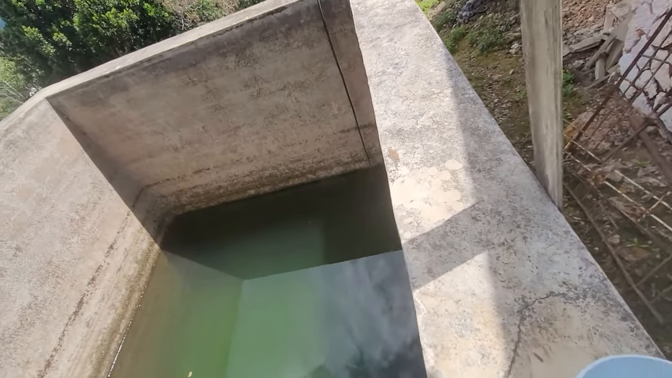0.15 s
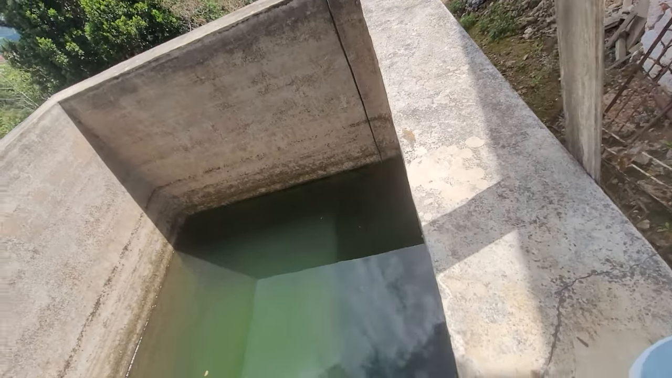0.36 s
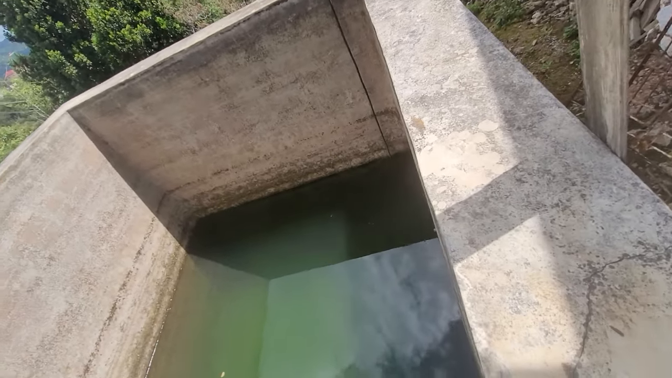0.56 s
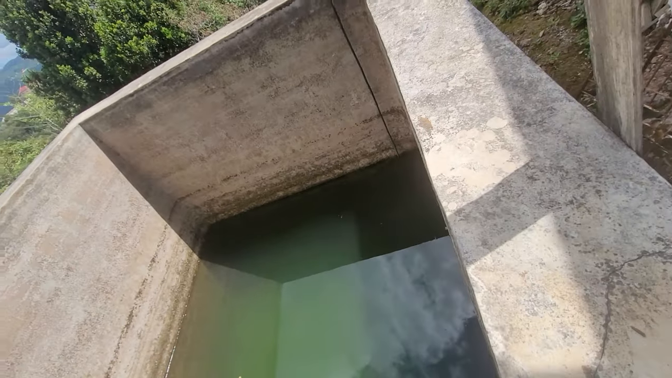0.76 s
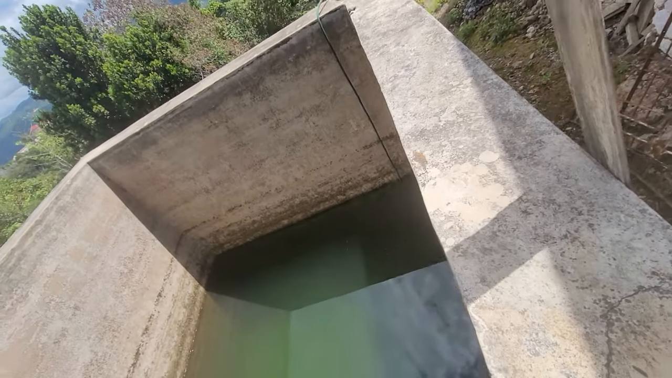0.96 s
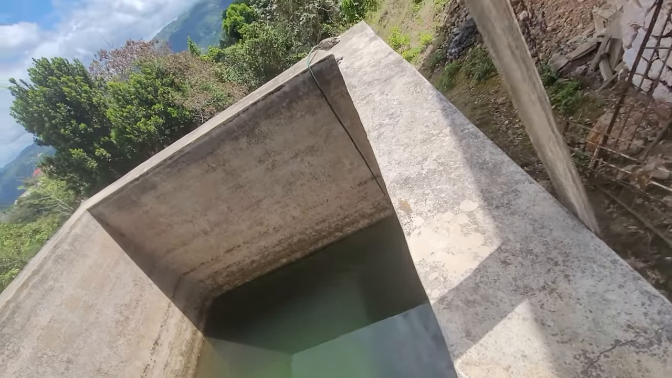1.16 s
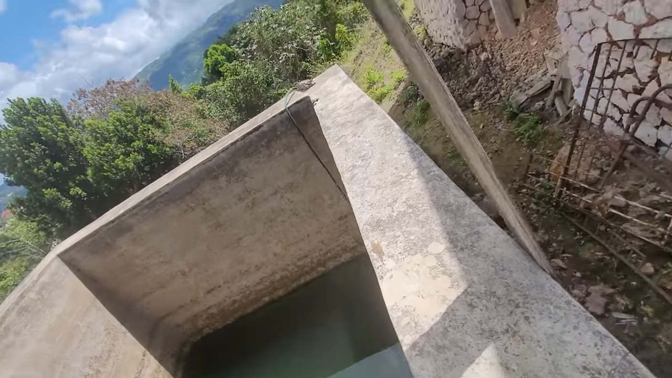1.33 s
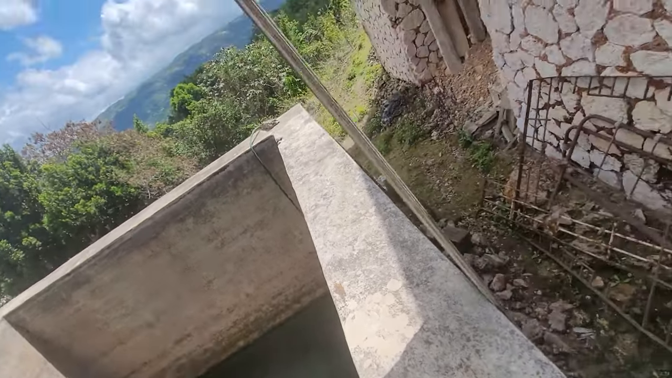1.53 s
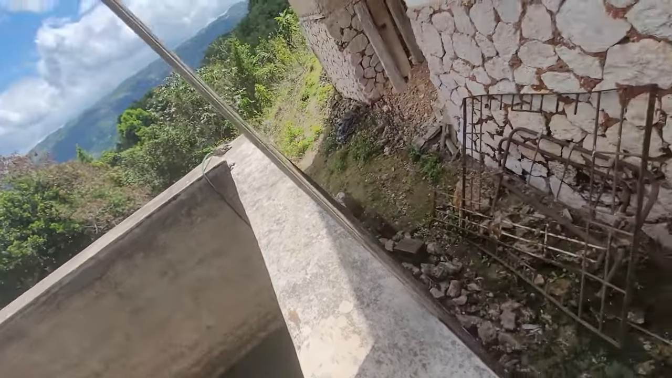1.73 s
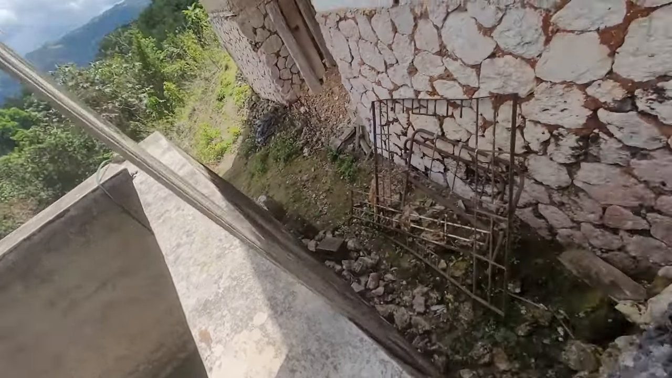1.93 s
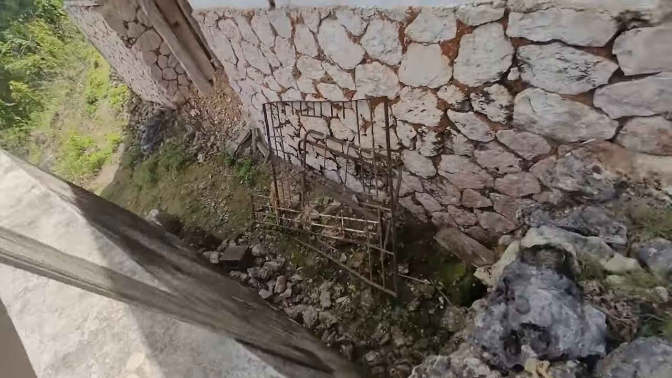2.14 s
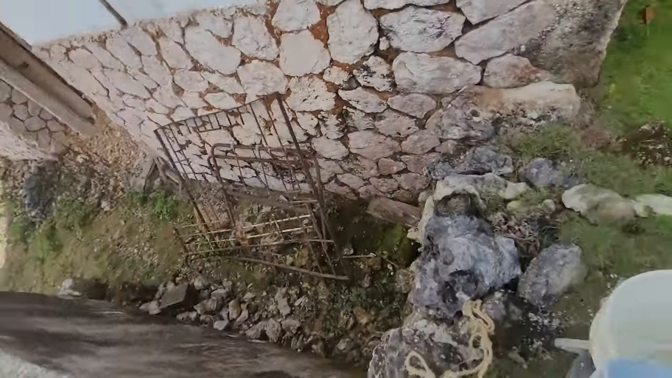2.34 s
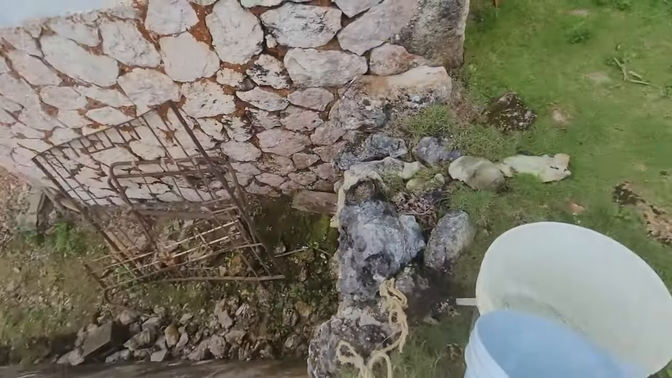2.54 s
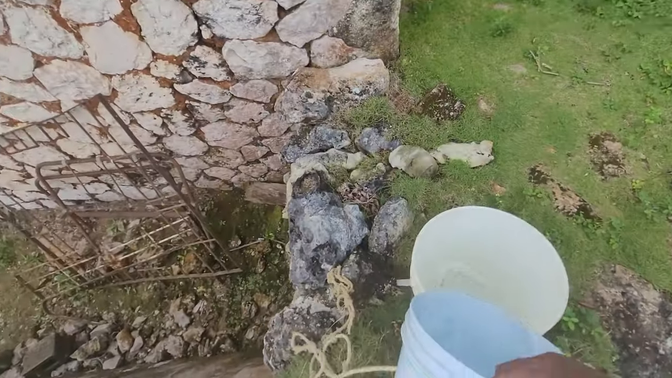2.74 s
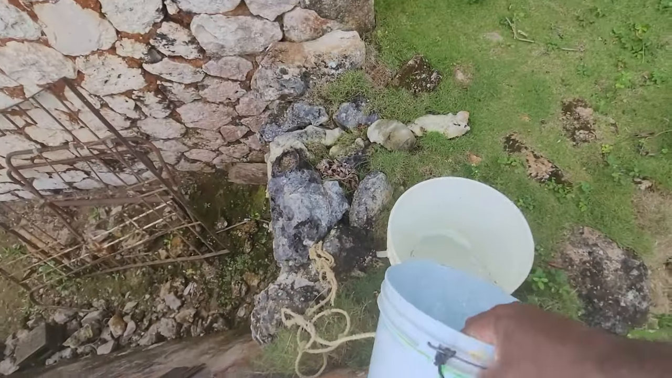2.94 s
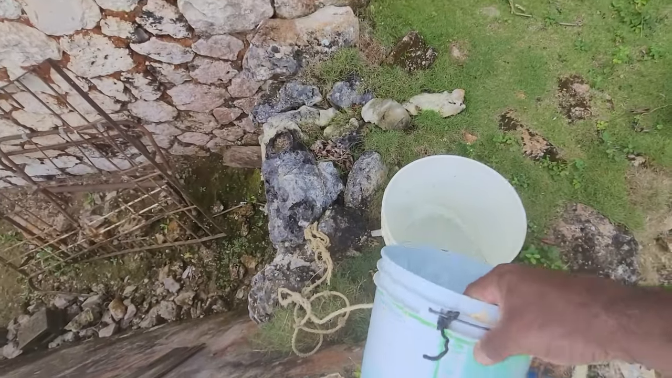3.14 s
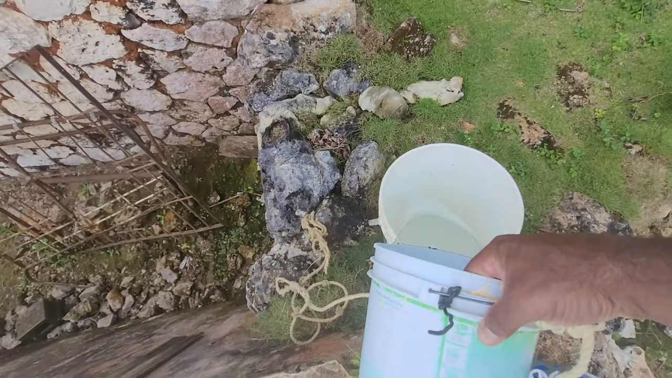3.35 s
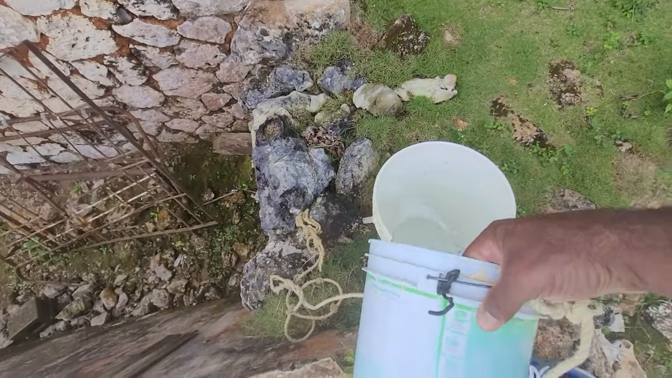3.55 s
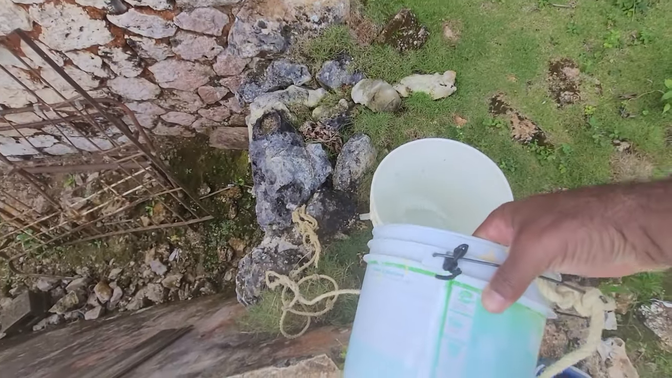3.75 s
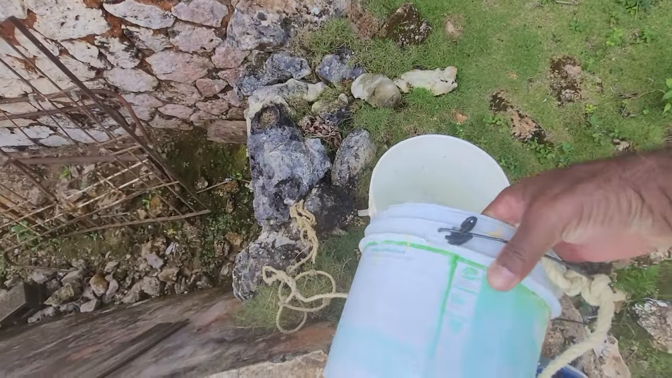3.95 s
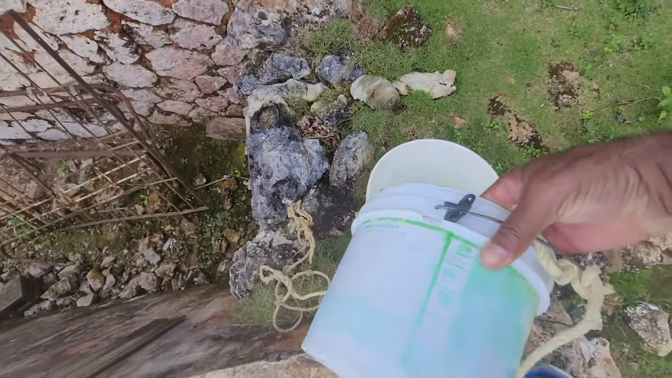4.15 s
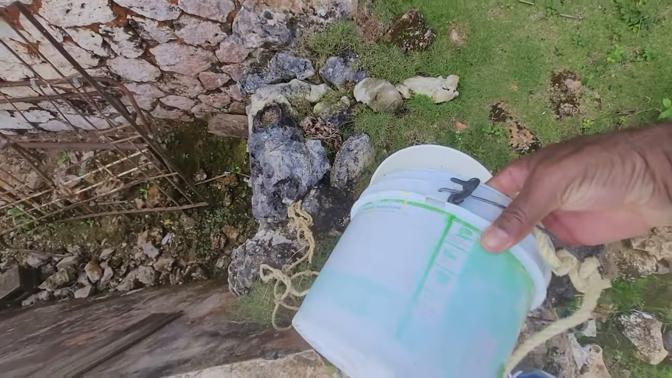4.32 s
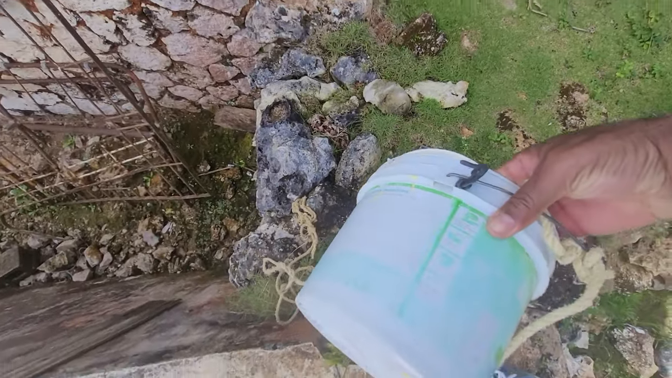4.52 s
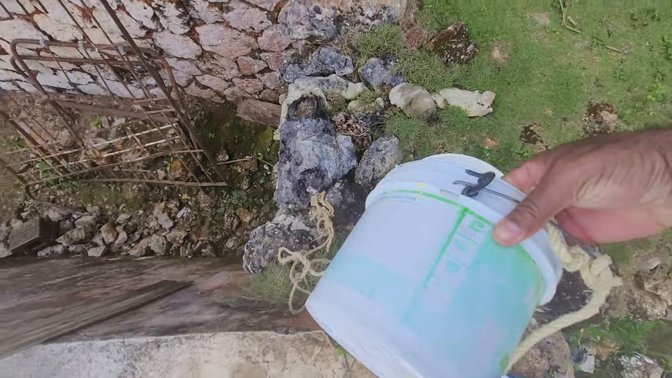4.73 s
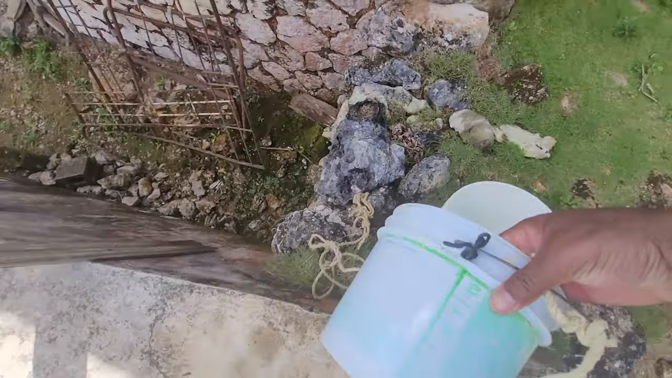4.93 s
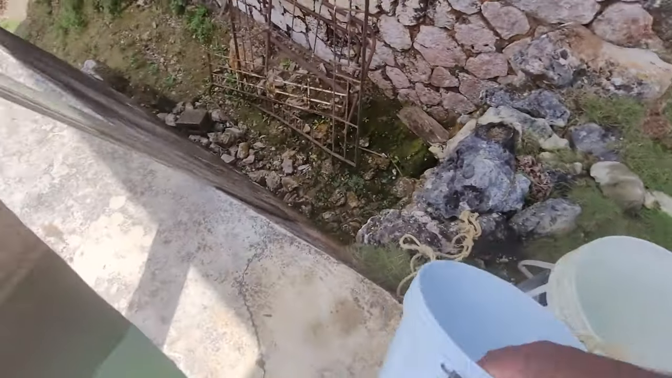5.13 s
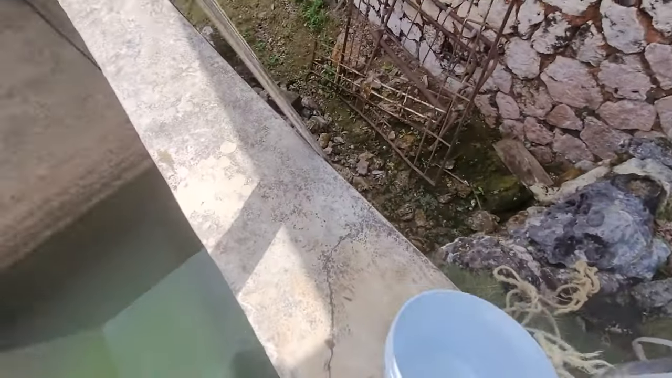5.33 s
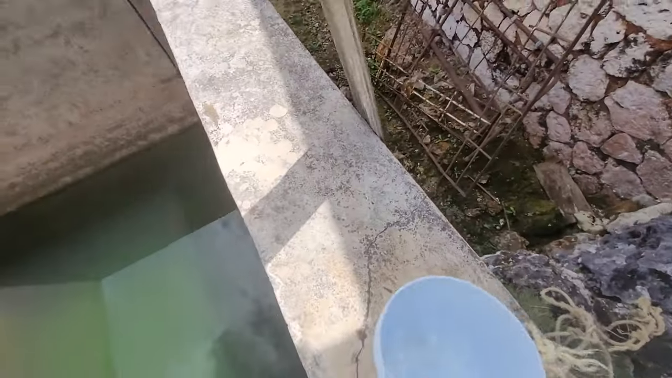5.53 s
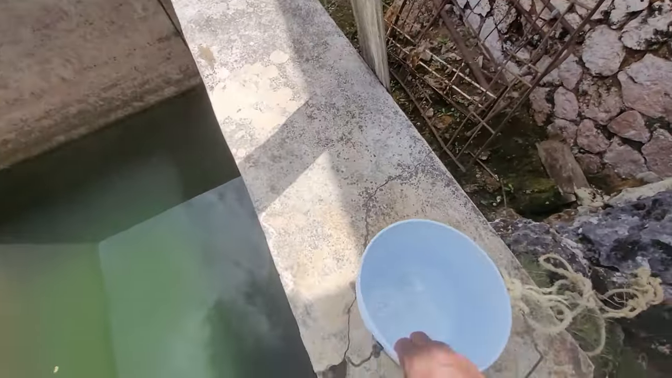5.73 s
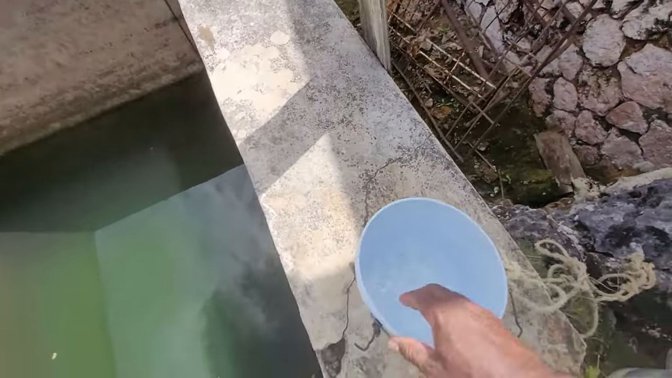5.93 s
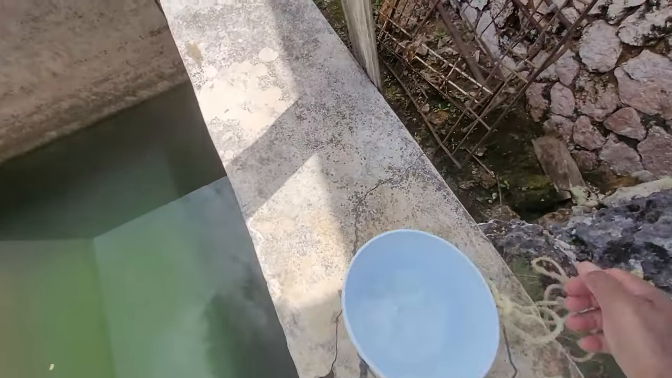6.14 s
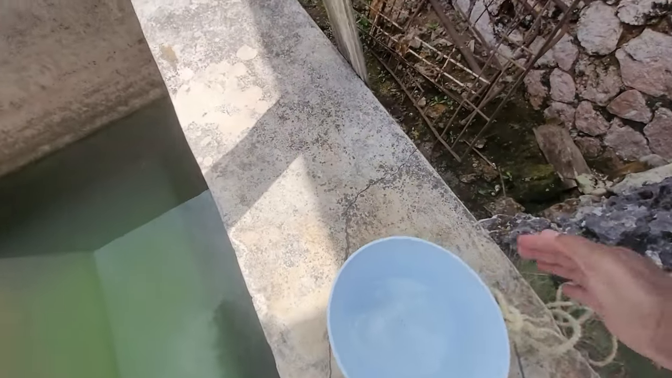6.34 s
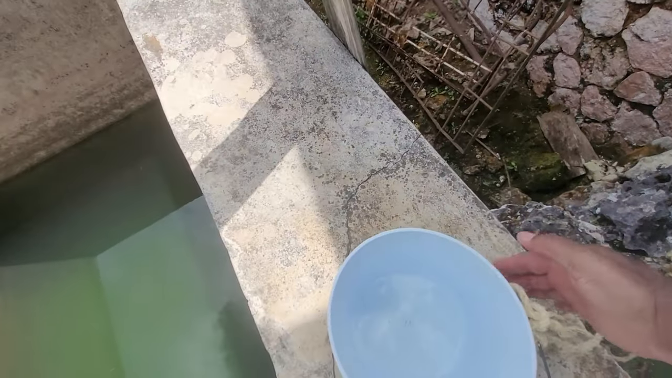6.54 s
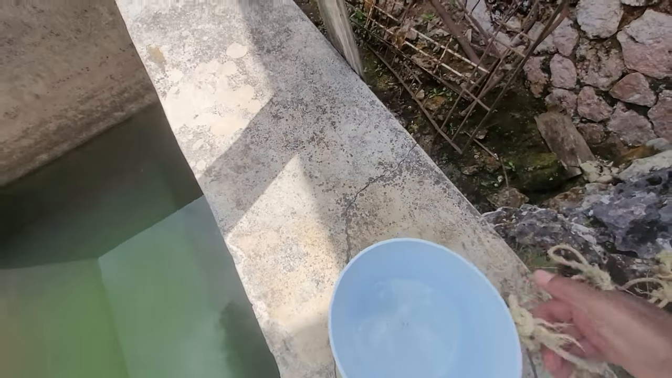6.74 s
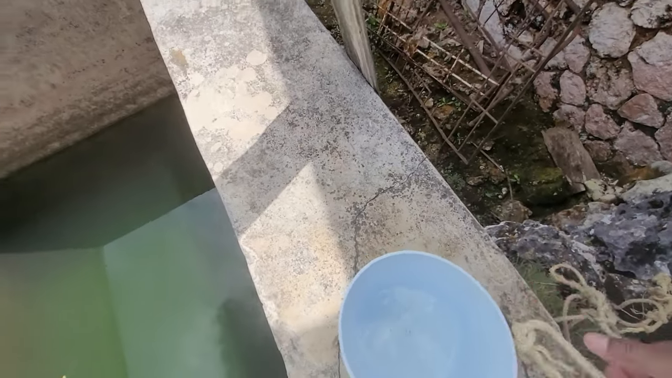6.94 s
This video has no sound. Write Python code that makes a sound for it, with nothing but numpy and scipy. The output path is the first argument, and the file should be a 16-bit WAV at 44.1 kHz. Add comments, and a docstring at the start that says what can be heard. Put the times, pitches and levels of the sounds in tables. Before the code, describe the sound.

Outdoors, light wind nudges the microphone over a faint hush of leaves and a distant bird and insect. Close by, a plastic bucket drags shortly over concrete, then empties into another bucket for about three seconds, spattering, bubbling and glugging. Its handle clicks and the stream thins to a dribble. The empty bucket lands on the concrete with a loud hollow knock, followed by small scrapes and soft bumps.

```python
"""Water pours from one plastic bucket into another, outdoors: drops spatter, bubbles ring and the air
in the lower bucket booms. First the full bucket is dragged off the gritty rim of a concrete tank;
afterwards the empty one is set down hard, rings briefly and is shuffled into place.
Light wind nudges the microphone, leaves hush, and a bird and an insect call far off."""
import sys
import numpy as np
from scipy import signal
from scipy.fft import rfft, irfft
from scipy.io import wavfile
from scipy.ndimage import uniform_filter1d, map_coordinates

SR = 44100
rng = np.random.default_rng(int(sys.argv[2]) if len(sys.argv) > 2 else 0)


def to_wav(s):
    """Save 16-bit WAV."""
    ch = np.atleast_2d(s).T  # columns
    pcm = np.round(np.clip(ch, -1, 1) * 32767)  # PCM
    wavfile.write(sys.argv[1], SR, pcm.astype(np.int16))


N = 312228
TIME = np.arange(N) / SR

# Levels in the tables are relative. A fade_s is the time a sound takes to fall by 60 dB.
# Tone of grit scraping on concrete: pitch_hz, level_db
GRIT_TONE = [(59, -54), (100, -17.5), (477, -7), (576, -15.5), (697, -6), (1040, -17.5), (1260, -8.5),
             (1430, -18.5), (2370, -18), (2990, -25.5), (15500, -32.5)]
# How much louder the left side is than the right: pitch_hz, left_minus_right_db
BALANCE = [(200, 0), (700, -2), (1290, -1.5), (2380, -4), (4400, -1), (9000, -1)]


def amp(db):
    """Turns decibels into a gain."""
    return 10 ** (np.asarray(db) / 20)


def evened(x):
    """Scales a signal to an average (rms) level of 1."""
    return x / np.sqrt(np.mean(x ** 2) + 1e-20)


def steadied(x, samples):
    """Takes out slow drifts of level and keeps the quick ones."""
    return x / np.sqrt(abs(uniform_filter1d(x ** 2, samples)) + 1e-9)


def read(points, hz):
    """Looks up a table's value at any pitch, on a log scale of pitch."""
    pitches, values = np.transpose(points)
    return np.interp(np.log(hz + 1), np.log(pitches + 1), values)


def curve(points, **ends):
    """Joins (time, value) points with straight lines."""
    return np.interp(TIME, *np.transpose(points), **ends)


def swell(start_s, length_s, rise_s, fade_s):
    """A level that rises, holds for the rest of its length and dies away."""
    t = TIME - start_s
    return np.clip(t / rise_s, 0, 1) ** 2 * amp(-60 * np.maximum(t - length_s, 0) / fade_s)


def add(mix, start_s, sound):
    """Mixes a sound in at the given time."""
    part = mix[..., round(start_s * SR):][..., :sound.shape[-1]]
    part += sound[..., :part.shape[-1]]


def colour(x, tone):
    """Gives a sound the tone in a table, with a filter that rings only after each hit."""
    log_gain = np.log(amp(read(tone, abs(np.fft.fftfreq(4096, 1 / SR)))))
    taps = np.fft.ifft(np.exp(np.conj(signal.hilbert(log_gain)))).real
    return signal.oaconvolve(x, taps[None], axes=1)[:, :x.shape[1]]


def band(x, low_hz, high_hz, order=2):
    """Keeps the pitches between two limits."""
    edges_hz = [low_hz, min(high_hz, .49 * SR)]
    return signal.sosfilt(signal.butter(order, edges_hz, "band", fs=SR, output="sos"), x)


def resonate(x, hz, width_hz):
    """Rings at a pitch that may move; a narrower width rings longer."""
    turn = np.exp(2j * np.pi * np.cumsum(hz * np.ones(x.shape[-1])) / SR)
    decay = np.exp(-np.pi * width_hz / SR)
    return 2 * (turn * signal.lfilter([1 - decay], [1, -decay], x / turn + 1e-18)).real


def body(x, notes, direct):
    """Part of the sound comes straight, the rest rings at an object's own notes."""
    return direct * x + sum(amp(db) * resonate(x, hz, width_hz) for hz, width_hz, db in notes)


def flutter(hz):
    """A random wobble of size about 1, with speeds up to about hz."""
    rates = np.fft.rfftfreq(N, 1 / SR)
    spectrum = rfft(rng.standard_normal(N)) * np.exp(-(rates / hz) ** 2) * (rates > hz / 10)
    return np.clip(evened(irfft(spectrum, N)), -2, 2)


def patter(per_s, spread_db):
    """Two trains of random taps; more spread makes a few stand out."""
    size = amp(spread_db * np.minimum(rng.exponential(1, (2, N)), 4))
    return evened(size * rng.choice([-1, 1], (2, N)) * (rng.random((2, N)) < per_s / SR))


def bursts(rows, width, broad_gain):
    """Short cracks, each strongest around its own pitch, with a spike at first contact."""
    out, t = np.zeros((2, N)), TIME[:SR // 5]
    for start_s, db, hz, fade_s in rows:
        noise = rng.standard_normal((2, 2 * len(t)))
        narrow = evened(band(noise, hz / (1 + width), hz * (1 + width)))
        broad = evened(band(noise, hz / 4, hz * 4, order=1))
        crack = 2 * np.tanh((narrow + broad_gain * broad)[:, len(t):] / 2)
        spike = 1 + np.exp(-t / .0006)
        onset = 1 - np.exp(-2 * hz * t)
        add(out, start_s, band(amp(db - 60 * t / fade_s) * spike * onset * crack, hz / 8, hz * 5))
    return out


def stereo(pair):
    """Two unrelated signals become one source heard left and right, alike in the bass."""
    # How alike the two sides are: pitch_hz, likeness (0 to 1)
    likeness = [(290, 0.87), (640, 0.71), (1400, 0.34), (3100, 0.17), (9000, 0.15)]
    hz = np.fft.rfftfreq(N, 1 / SR)
    common, separate = rfft(pair)
    same = np.clip(read(likeness, hz), 0, 1)
    lean = amp(read(BALANCE, hz) / 2)
    left = same * common + np.sqrt(1 - same ** 2) * separate
    return irfft(np.array([left * lean, common / lean]), N)


def leaves():
    """A soft hush of leaves that wavers a little."""
    # Tone of the hush: pitch_hz, level_db
    tone = [(88, -37), (150, -10), (179, -13.5), (253, -1), (1290, -22.5), (4840, -21.5), (5870, -27),
            (7710, -21.5), (10500, -29.5), (15500, -23.5)]
    # Its slow rise and fall: time_s, level_db
    loudness = [(.3, -68), (1.3, -70), (2.2, -64.5), (5.7, -63.5), (6.4, -69)]
    hush = stereo(evened(colour(rng.standard_normal((2, N)), tone)))
    return hush * amp(curve(loudness) + .7 * flutter(hz=5.5))


def far_calls():
    """A bird's chips and an insect's buzz, smeared by distance into thin bands of noise."""
    # The calls: start_s, level_db, pitch_hz, width_hz, rise_s, fade_s
    calls = [(0, -66, 4390, 1100, 0.02, 1.1), (1.54, -76, 5450, 600, 0.044, 0.56),
             (1.781, -64.5, 8330, 2600, 0.2, 4.2), (5.32, -53.5, 7240, 1355, 0.011, 0.43),
             (5.786, -57, 8070, 913, 0.014, .4), (6.344, -53.5, 7420, 1400, 0.018, 0.47)]
    out, t = np.zeros((2, N)), TIME[:SR]
    for start_s, db, hz, width_hz, rise_s, fade_s in calls:
        buzz = evened(band(rng.standard_normal((2, SR)), hz - width_hz / 2, hz + width_hz / 2, order=4))
        level = np.minimum(t / rise_s, 1) * amp(db - 60 * np.maximum(t - rise_s, 0) / fade_s)
        add(out, start_s, buzz * level)
    return out


def wind():
    """Wind buffets the microphone in low lumps; each gust hits one side harder."""
    # Tone of the buffeting: pitch_hz, level_db
    tone = [(20, -16), (55, 4), (80, -4.5), (130, -18.5), (200, -29.5), (800, -80.5)]
    # The gusts: start_s, length_s, level_db, left_minus_right_db
    gusts = [(0.024, 0.047, -41.5, 20), (0.735, 0.079, -42, -23), (1.062, 0.3, -48.5, -28),
             (1.352, 0.072, -37.5, -29), (1.506, 0.27, -42, -4), (1.974, 0.066, -38.5, -3.5),
             (2.278, .25, -47.5, -11), (3.4, 1.8, -58.5, 2), (4.604, 0.24, -49, 7), (4.859, 0.51, -39.5, 1),
             (5.638, 0.086, -46.5, -3), (6.13, 0.8, -40, -5.5), (6.411, .1, -28, -8)]
    buffets = steadied(colour(rng.standard_normal((2, N)), tone), samples=2200)
    power = amp(-64) ** 2 / 2  # the calm between gusts
    for start_s, length_s, db, side_db in gusts:
        sides = amp(side_db * np.array([[.5], [-.5]]))
        gust = amp(db) * swell(start_s, length_s, rise_s=.044, fade_s=.25)
        power = power + (gust * sides / np.linalg.norm(sides)) ** 2
    return buffets * np.sqrt(power) * amp(4.3 * flutter(hz=19) - 1.5)


def wall_echoes(x, fade_s):
    """Scattered echoes come back from the stone walls and the tank."""
    t = TIME[:SR // 2]
    echoes = rng.standard_normal((2, len(t))) * (rng.random((2, len(t))) < 3000 / SR)
    tail = echoes * (t > .012) * amp(-60 * t / fade_s)
    return signal.fftconvolve(x, tail / np.linalg.norm(tail[0]), axes=1)[:, :N]


def drag():
    """Grit catches under the full bucket and shakes its walls."""
    # Notes of the full bucket: pitch_hz, width_hz, level_db
    notes = [(467, 30, 1), (689, 15, 4), (830, 40, -7.5), (1214, 54, -8), (2380, 260, -18)]
    # A faint rustle, like a hand gripping the bucket, then pulls over the concrete:
    # start_s, length_s, level_db
    moves = [(0, 0.28, -66.5), (0.451, 0.22, -57), (0.676, 0.033, -39), (0.753, 0.17, -39.5)]
    grit = colour(body(patter(per_s=2200, spread_db=0), notes, direct=.82), GRIT_TONE)
    level = sum(amp(db) * swell(start_s, length_s, rise_s=.035, fade_s=.16)
                for start_s, length_s, db in moves)
    return stereo(steadied(grit, samples=3000) * level)


def knocks():
    """The handle and stray grit click; hand and rope bump softly against the bucket."""
    # Sharp clicks: start_s, level_db, pitch_hz, fade_s
    clicks = [(.433, -53.5, 8750, .018), (.702, -25.5, 2120, .031), (.703, -28, 3892, .023),
              (.706, -28, 620, .07), (.909, -31.5, 3640, .03), (1.864, -46.5, 2200, .034),
              (1.933, -45, 557, .17), (4.5633, -18, 11300, .016), (4.6355, -21.5, 7500, .015),
              (4.6643, -7.5, 4100, .009), (4.674, -17.5, 4230, .018), (6.132, -49, 2880, .008),
              (6.179, -45.5, 3080, .011)]
    # Soft bumps: start_s, level_db
    bumps = [(6.424, -23), (6.552, -23.5), (6.887, -23.5)]
    bump_hz, bump_fade_s = 110, .04
    thuds = [(start_s, db, bump_hz, bump_fade_s) for start_s, db in bumps]
    return stereo(amp(-3) * bursts(clicks + thuds, width=.23, broad_gain=.4))


def shuffle():
    """The empty bucket grinds over the concrete: a hollow rumble with a little grit."""
    # Tone of the rumble: pitch_hz, level_db
    tone = [(70, -12.5), (190, 4), (300, -17), (370, -0.5), (450, -2.5), (500, -14.5), (750, -22.5),
            (825, -12), (900, -30), (1500, -56)]
    # Short slides: start_s, length_s, rumble_db, grit_db, fade_s
    slides = [(5.833, 0.043, -29.5, -43, 0.16), (5.91, .06, -41.5, -61, .3),
              (5.998, 0.073, -44, -58.5, 0.28), (6.135, 0.041, -45.5, -72, 3.1)]
    slips = patter(per_s=520, spread_db=.5) * amp(3.6 * flutter(hz=29.6))
    rumble = steadied(colour(slips, tone), samples=5000)
    grit = evened(band(colour(patter(per_s=670, spread_db=1.5), GRIT_TONE), 970, 14000))
    out = np.zeros((2, N))
    for start_s, length_s, rumble_db, grit_db, fade_s in slides:
        level = swell(start_s, length_s, rise_s=.014, fade_s=fade_s)
        out += (amp(rumble_db) * rumble + amp(grit_db) * grit) * level
    return stereo(out)


def set_down():
    """The empty bucket lands, rocks and is nudged; the hand shortens its ring."""
    # Notes of the empty bucket: pitch_hz, level_db, fade_s
    notes = [(152, -23.5, .2), (234.8, -8, 0.3), (332, -26.5, 0.028), (400.7, -15.5, 0.2), (432, -19, 0.24),
             (530, -27.5, 0.21), (624, -24.5, 0.086), (797, -23, 0.079), (812, -24, 0.18),
             (1054, -33.5, .11), (1231, -34, 0.16), (1561, -25, .06), (1520, -37, 0.14),
             (1650, -33.5, 0.07), (2406, -26, 0.062), (2575, -17.5, 0.024), (3650, -25.5, .025)]
    # Blows on it: start_s, level_db, ring_share (part of the free ringing time)
    blows = [(5.8072, -9.5, 0.081), (5.8101, 4, 0.76), (5.8215, -8, 0.29), (5.935, -29.5, .45),
             (6.02, -25, 0.3), (6.082, -22, 0.17), (6.18, -26.5, 0.27), (6.234, -29, 0.22),
             (6.387, -35, 0.43), (6.545, -29, .19), (6.606, -28.5, 0.12), (6.665, -34, 0.33),
             (6.804, -36, 0.16)]
    # Tone of the crack at each blow: pitch_hz, level_db
    crack_tone = [(180, -10), (300, -2), (701, -12.5), (856, -11), (1150, -34.5), (1560, -16.5),
                  (2570, -24.5), (2980, -32.5), (7200, -33), (16000, -67.5)]
    rings, cracks, t = np.zeros(N), np.zeros((2, N)), TIME[:SR // 2]
    note_hz, note_db, fade_s = np.array(notes).T[:, :, None]
    for start_s, db, ring_share in blows:
        ring = (amp(note_db - 60 * t / (fade_s * ring_share)) * np.sin(2 * np.pi * note_hz * t)).sum(0)
        ring *= amp(-1100 * np.clip(t - .082, 0, None))  # the base settles flat and stops ringing
        crack = evened(colour(rng.standard_normal((2, len(t))), crack_tone))
        crack *= amp(-15 - 60 * t / .032) + amp(-26 - 60 * t / .27)  # quick snap, quieter tail
        bright_hz = 220 + 8460 * amp(db) ** 1.3  # harder blows are brighter
        contact = signal.butter(2, min(bright_hz, SR / 3), fs=SR)
        add(rings, start_s, -amp(db) * signal.lfilter(*contact, ring))
        add(cracks, start_s, amp(db) * signal.lfilter(*contact, crack))
    lean = amp(read(BALANCE, np.fft.rfftfreq(N, 1 / SR)) * np.array([[.5], [-.5]]))
    bucket = irfft(rfft(rings) * lean, N) + stereo(cracks)
    return band(bucket, 160, 19000)  # little bass below 160 Hz


def foam():
    """Tiny bubbles go on bursting in the lower bucket after the pour."""
    fizz = evened(band(patter(per_s=2500, spread_db=4.5), 3800, 19000))
    return fizz * amp(-61.5) * swell(start_s=4.85, length_s=.6, rise_s=.066, fade_s=3.3)


def bubbles(per_s, low_hz, high_hz, cycles, glide, spread_db, sizes=48):
    """Each size of bubble rings for some cycles and rises in pitch as it nears the surface."""
    out = np.zeros((2, N))
    for hz in np.geomspace(low_hz, high_hz, sizes):
        turns = np.arange(0, 5 * cycles, hz / SR)
        ring = np.sin(2 * np.pi * turns * (1 + glide * turns / cycles)) * np.exp(-turns / cycles) * hz
        for side, when, chance in rng.random((round(2 * per_s * N / SR / sizes), 3)):
            strength = amp(spread_db * min(-np.log(chance), np.pi))
            add(out[int(2 * side)], when * N / SR, ring * strength)
    return evened(out)


def follow_pour(base_db, plunge_db, steepness):
    """Gain of one water sound: it grows with the flow and shifts as the stream plunges deeper."""
    # Strength of the stream as the bucket tips: time_s, level_db
    flow_db = [(2.19, -47.5), (2.22, -31.5), (2.36, -31), (2.48, -36), (2.52, -33.5), (2.59, -39.5),
               (2.68, -32.5), (2.77, -39.0), (3.22, -32), (3.26, -28), (3.34, -32.5), (3.75, -26.0),
               (3.77, -30), (4.2, -32.5), (4.26, -28.5), (4.38, -33.5), (4.64, -33), (4.67, -29),
               (4.69, -34.5), (4.92, -43.5), (4.95, -55.5), (4.98, -54)]
    # How it lands: time_s, depth (0 spatters on the surface, 1 plunges deep)
    depth = [(2.2, 0.34), (2.4, 0.59), (2.68, 0.1), (2.85, 0.36), (3.65, 0.68), (4.3, 1), (4.62, 0.7),
             (4.8, 0.63)]
    full_db = -32  # a full flow
    last_dribble = amp(-45) * swell(start_s=5.04, length_s=.16, rise_s=.12, fade_s=.48)
    flow = amp(curve(flow_db, left=-140, right=-140)) + last_dribble
    return (flow / amp(full_db)) ** steepness * amp(full_db + base_db + plunge_db * curve(depth))


def boom():
    """The stream pumps the air in the lower bucket; large bubbles glug and pockets of air gulp."""
    # The air's note, which rises through the pour and sinks a little at the end: time_s, pitch_hz
    air_note = [(2.2, 203), (3.1, 216), (3.7, 237), (4.2, 270.5), (4.55, 259), (4.9, 245)]
    # Big gulps of trapped air: start_s, level_db
    gulps = [(2.228, -30), (2.917, -28), (3.107, -22), (3.399, -23.5), (3.66, -29), (3.851, -23),
             (4.082, -18), (4.165, -24), (4.247, -18.5), (4.289, -21.5), (4.353, -15), (4.553, -18),
             (4.675, -23), (4.77, -24), (4.869, -26.5), (5.241, -39)]
    hz, t = curve(air_note), TIME[:SR // 5]
    pushes = patter(per_s=540, spread_db=1.5)[0]
    air = band(resonate(resonate(pushes, hz, width_hz=48), hz, width_hz=190), 150, 1200)
    glugs = bubbles(per_s=110, low_hz=270, high_hz=440, cycles=3.5, glide=.005, spread_db=2.5, sizes=12)
    air = steadied(air * amp(1.7 * flutter(hz=21)), samples=5000)
    out = air * follow_pour(base_db=-19.5, plunge_db=14.1, steepness=.72)
    out += steadied(glugs[0], samples=8000) * follow_pour(base_db=-10.5, plunge_db=-8.5, steepness=1)
    for start_s, db in gulps:
        gulp_hz = .99 * np.interp(start_s, TIME, hz)  # just under the air's note
        level = amp(db - 60 * t / .094) * (1 - np.exp(-t / .004))
        add(out, start_s, level * np.sin(2 * np.pi * gulp_hz * t))
    return out


def slaps():
    """The loudest slaps of water; higher ones die sooner."""
    # The slaps: start_s, level_db, pitch_hz
    hits = [(2.182, -33.5, 11200), (2.354, -27, 1330), (2.655, -32, 5560), (2.894, -30, 7200),
            (3.228, -26.5, 3170), (3.45, -22.5, 2460), (3.515, -21, 2200), (3.640, -23.5, 6140),
            (3.856, -22.5, 1760), (3.974, -24.5, 2600), (4.725, -36, 2770), (4.75, -33.5, 3950),
            (4.776, -28, 2800), (4.909, -50, 2020), (5.009, -41.5, 1450), (5.094, -47, 1550),
            (5.295, -41.5, 1070)]
    rows = [(start_s, db, hz, .056 * (1000 / hz) ** .31) for start_s, db, hz in hits]
    return bursts(rows, width=.47, broad_gain=.5)


def stream():
    """Lumps of water land as drops and bubbles: low gurgle, splash, fine spray and coarse spatter."""
    # Tone of the landing water: pitch_hz, level_db
    tone = [(210, -25), (350, 1), (512, -1), (671, -2.5), (892, -3.5), (1060, -2.5), (1680, 0), (2310, 4),
            (3780, 5), (7710, -11), (8760, -20.5), (11500, -16), (15500, -20.5)]
    # Higher notes of the air in the lower bucket: pitch_hz, width_hz, level_db
    hollow_notes = [(388, 7.3, -5), (702, 97, 1), (797, 59, -0.5), (1044, 120, 5), (1247, 77, -0.5),
                    (1477, 38, -0.5), (1790, 55, -10.5), (2330, 120, -6)]
    lumps = flutter(hz=45)
    drops = patter(per_s=7000, spread_db=4.5)
    froth = bubbles(per_s=1300, low_hz=600, high_hz=6000, cycles=11, glide=.003, spread_db=4.2)
    plinks = bubbles(per_s=90, low_hz=550, high_hz=3000, cycles=16, glide=.002, spread_db=3)
    water = colour(body(drops + .55 * froth + .25 * plinks, hollow_notes, direct=.9), tone)
    gurgle = band(water, 340, 1800, order=3) * amp(1.5 * lumps + .77 * flutter(hz=60))
    splash = band(water, 1800, 6000, order=3) * amp(2.2 * lumps + .58 * flutter(hz=70.5))
    spray = band(water, 7340, 17000, order=3) * amp(1.2 * lumps + 1.4 * flutter(hz=91))
    big_drops = abs(patter(per_s=70, spread_db=2.5)[0])
    splats = signal.lfilter([1], [1, -np.exp(-1 / (.003 * SR))], big_drops)  # each lasts about 3 ms
    spatter = band(drops, 900, 5000, order=1) * splats  # stands out as the stream thins
    out = steadied(gurgle, samples=5000) * follow_pour(base_db=-5.5, plunge_db=2.3, steepness=.94)
    out += steadied(splash, samples=5000) * follow_pour(base_db=-5.5, plunge_db=4.1, steepness=1.18)
    out += steadied(spray, samples=5000) * follow_pour(base_db=0, plunge_db=-10.5, steepness=1.2)
    out += steadied(spatter, samples=12000) * follow_pour(base_db=-13.5, plunge_db=1, steepness=.85)
    return stereo(out + slaps())


def scene():
    """Water, bucket handling and the outdoors, heard by a turning stereo microphone."""
    # How late the left side hears as the microphone turns: time_s, delay_ms
    left_delay = [(2.3, 0.42), (2.8, 0.22), (3.2, 0.12), (4.8, 0.084), (5.85, 0.077), (6.2, -0.23)]
    water = stream()
    handling = drag() + knocks() + set_down()
    left, right = water + boom() + handling + shuffle()
    delay_samples = curve(left_delay) * SR / 1000
    near = np.array([map_coordinates(left, [np.arange(N) - delay_samples], order=5), right])
    echoes = wall_echoes(amp(-15) * water + amp(-20) * band(handling, 600, 16000, order=1), fade_s=.33)
    return near + echoes + foam() + wind() + leaves() + far_calls()


def record(dry):
    """Rounds off the loudest peaks, then cuts the treble above 16 kHz."""
    limited = dry / (1 + dry ** 8) ** (1 / 8)
    treble_cut = signal.firwin(511, 16000, window=("kaiser", 9), fs=SR)
    return signal.oaconvolve(limited, treble_cut[None], "same")


dry = scene()
out = record(dry)
to_wav(out)
```